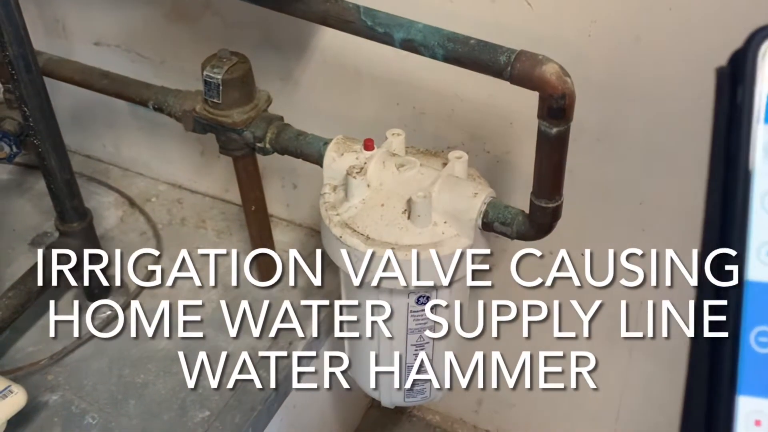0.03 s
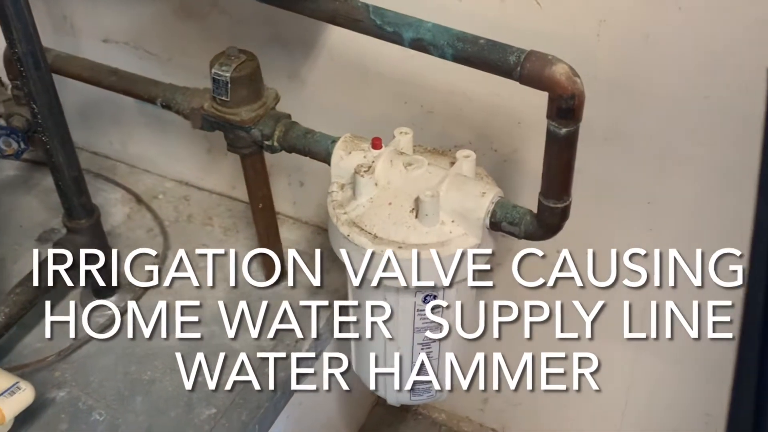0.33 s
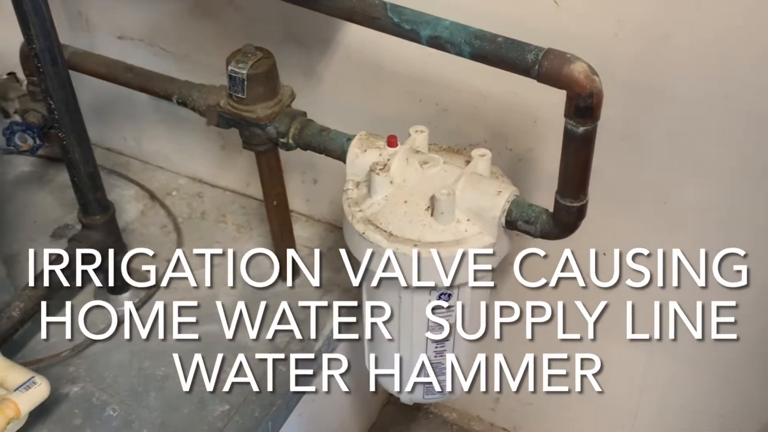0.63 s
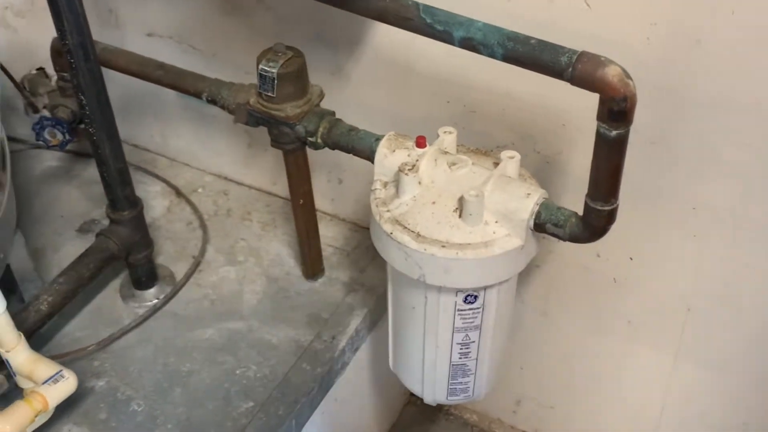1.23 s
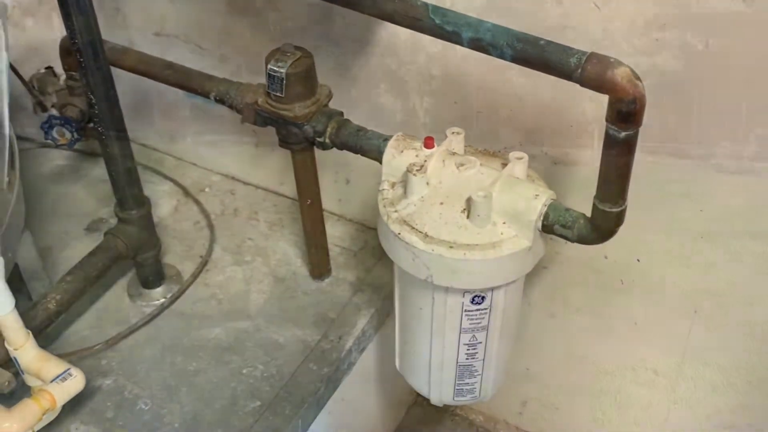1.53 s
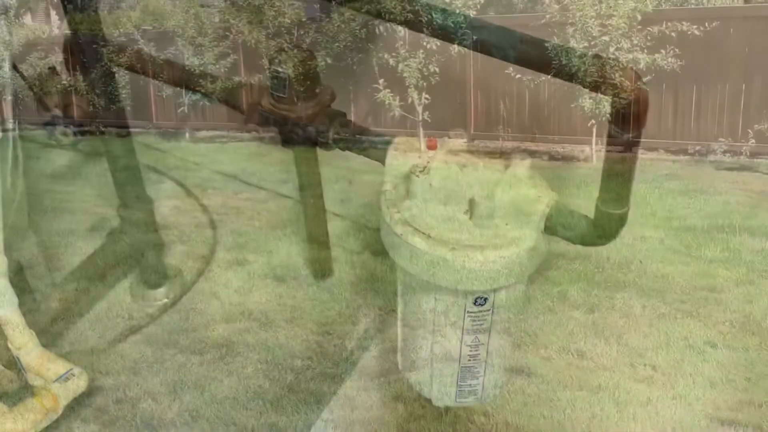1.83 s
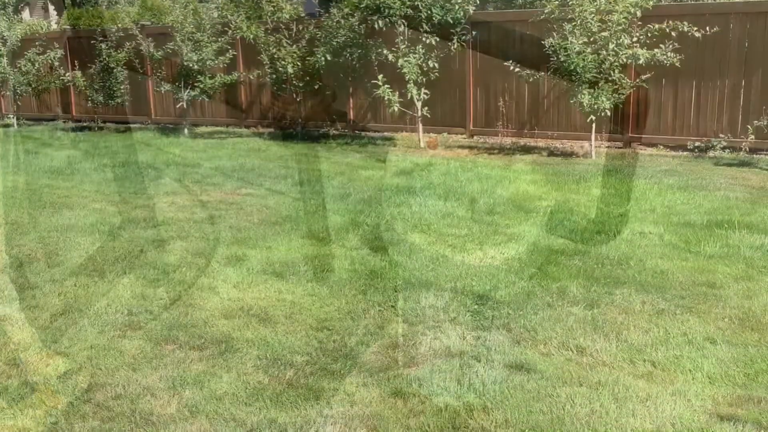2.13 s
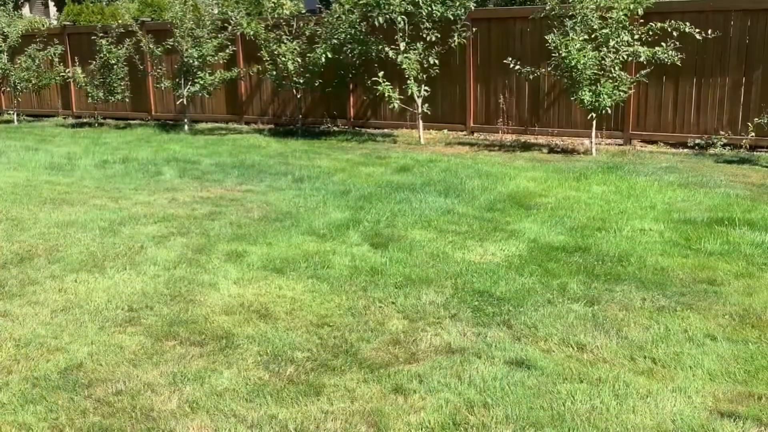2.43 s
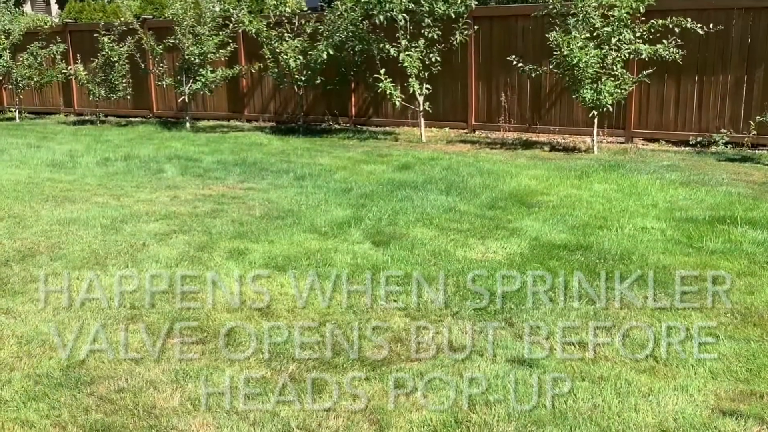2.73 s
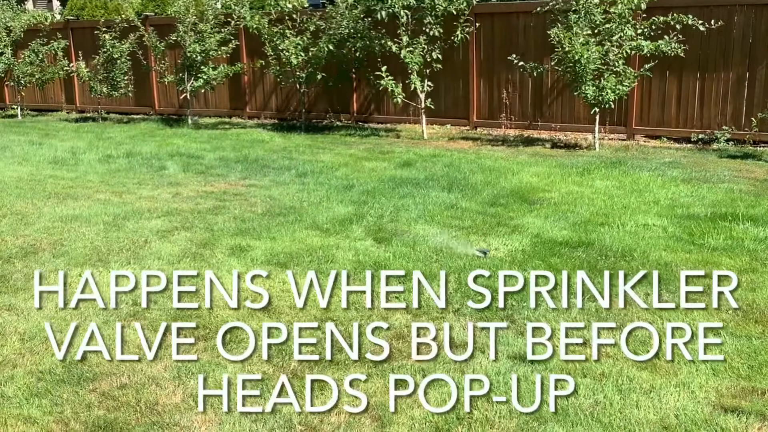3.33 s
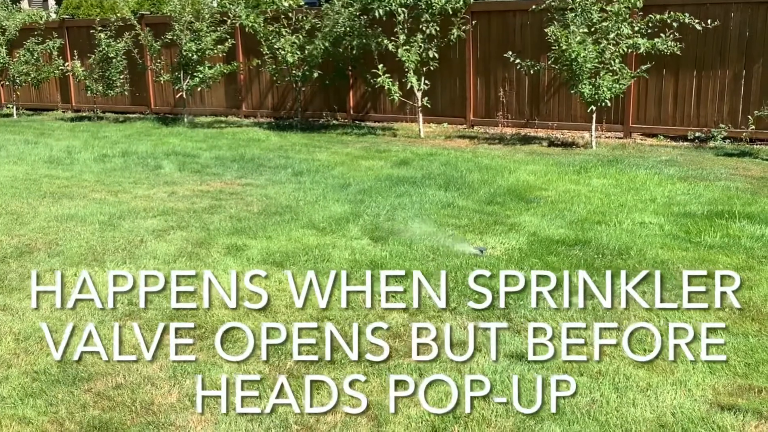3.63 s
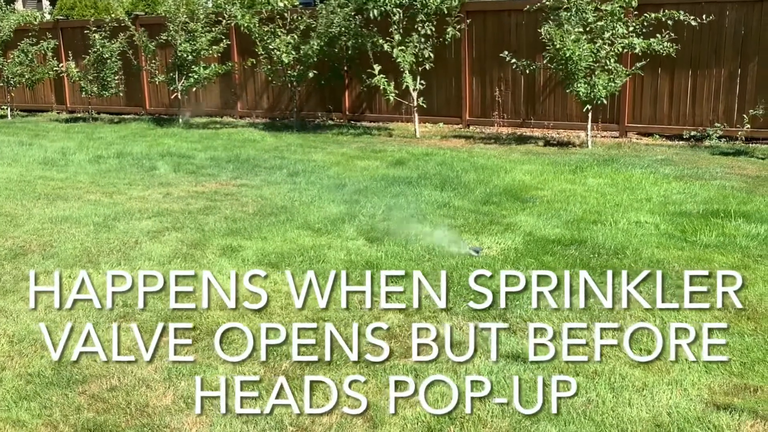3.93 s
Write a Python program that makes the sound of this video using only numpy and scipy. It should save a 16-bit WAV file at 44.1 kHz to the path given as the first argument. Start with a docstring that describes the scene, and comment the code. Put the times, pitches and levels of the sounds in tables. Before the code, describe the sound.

A water pipe bangs loudly in a basement, about nine times a second, each metal clank followed by dull knocks. It slows slightly and stops around 1.4 seconds with a faint creak. The microphone is bumped near 1.8 seconds. A distant sprinkler ticks faintly from 2.3 seconds; from 2.7 a nearer one gurgles, softly hisses and spits. Wind buffets the microphone, more strongly from 3.4 to 4 seconds.

```python
"""Water hammer in a basement: over a low rumble and faint hiss, surges of water make a copper pipe bang
about nine times a second, slow a little and stop. Each bang is a metal clank, then dull knocks of the
pipe against its supports. The pipe creaks, the microphone is bumped, and a garden fades in: a distant
sprinkler ticks, a near one gurgles, hisses and spits, and wind buffets the microphone."""
import sys
import numpy as np
from scipy import signal
from scipy.fft import rfft, irfft
from scipy.io import wavfile
from scipy.ndimage import uniform_filter1d

SR = 44100
rng = np.random.default_rng(int(sys.argv[2]) if len(sys.argv) > 2 else 0)


def put_to_file(sound):
    """Save the sound as 16-bit audio at rate SR, in the file named by the first command-line argument."""
    columns = np.atleast_2d(sound).T  # one column per channel
    safe = np.clip(columns, -1, 1)
    whole_steps = np.round(safe * 32767)
    wavfile.write(sys.argv[1], SR, whole_steps.astype(np.int16))


N = 176400

# the pipe's bangs: (time [s], thump level [dB], clank level [dB], clank's bite [dB], clank's treble [dB])
BANGS = [(0.0123, -0.5, -1.5, -9, -2.5), (.120, -0.5, -2, -11.5, -3.5), (0.2271, -1, -1.5, -7, 0),
         (.336, 0, -2, 1, 1.5), (0.447, -0.5, -3, 2.5, 4), (.56, -0.5, -4.5, 5.5, 5.5),
         (.677, -0.5, -6, 7.5, 6.5), (.796, -0.5, -5, 6.5, 5), (0.9147, -1.5, -4, 5, 6),
         (1.0353, -1, -1.5, 2.5, 3.5), (1.155, -0.5, -2, 4, 2), (1.275, -0.5, -3, 2.5, 1),
         (1.395, -3, -7.5, 4.5, -5)]
# how alike left and right sound: (frequency [Hz], likeness [-1 opposite to 1 the same])
INDOOR_LIKENESS = [(100, 0.76), (350, 0.93), (700, 0.31), (1300, -0.24), (2400, -0.081), (4000, -0.28),
                   (7000, -0.18), (9000, 0.69), (14000, 1)]
OUTDOOR_LIKENESS = [(150, 1), (400, 0.76), (900, 0.41), (3000, 0.36), (4200, 0.16), (7000, 0.57),
                    (9000, 0.9), (14000, .99)]


def from_db(db):
    """Turn decibels into a factor to multiply by."""
    return 10 ** (np.asarray(db) / 20)


def rms_one(x):
    """Scale a signal to an average power of 1."""
    return x / np.sqrt(np.mean(x ** 2) + 1e-20)


def clock():
    """The time of every sample, in seconds."""
    return np.arange(N) / SR


def level(rows):
    """A volume curve through points of (time [s], level [dB])."""
    return from_db(np.interp(clock(), *np.transpose(rows)))


def at_hz(points):
    """Read a (frequency [Hz], value) table at every frequency."""
    hz, value = np.transpose(points)
    return np.interp(np.log(np.fft.rfftfreq(N, 1 / SR) + 1), np.log(hz), value)


def noise(spectrum, likeness):
    """Stereo noise with the given tone colour and left-right likeness, at power 1."""
    mid, side = rfft(rng.standard_normal((2, N)))
    alike = np.clip(at_hz(likeness), -1, 1)
    stereo = np.sqrt(1 + alike) * mid + np.sqrt(1 - alike) * side * [[1], [-1]]
    return rms_one(irfft(from_db(at_hz(spectrum)) * stereo, N))


def butter(x, hz, kind, order=2):
    """A filter that keeps the "low" part, the "high" part or a "band" of a sound."""
    return signal.sosfilt(signal.butter(order, hz, kind, fs=SR, output="sos"), x + 1e-18)


def boost(x, db, hz, kind):
    """Turn one range of frequencies up or down."""
    return x + (from_db(db) - 1) * butter(x, hz, kind, order=1)


def even(x, size):
    """Hold the power near 1 over every stretch of `size` samples."""
    return x / np.sqrt(uniform_filter1d(x ** 2, size) + 1e-12)


def wobble(hz):
    """A random wavering, mostly slower than `hz`, at power 1."""
    return rms_one(butter(rng.standard_normal(N), hz, "low"))


def resonant_noise(hz, width_hz):
    """Steady noise around one pitch."""
    band = [hz - width_hz / 2, hz + width_hz / 2]
    return even(butter(rng.standard_normal(N), band, "band"), size=1200)


def burst(start, rise, hold, fall):
    """A volume curve that swells up to `start`, holds and dies away; all in seconds."""
    t = clock() - start
    return np.exp(np.maximum(np.minimum(t, 0) / rise - np.maximum(t - hold, 0) / fall, -60))


def clicks(times, gains):
    """One click at each time."""
    out = np.zeros(N)
    np.add.at(out, (np.abs(times) * SR).astype(int), gains)
    return out


def modes(table):
    """A struck object's tones, alternating in sign; each fades by 60 dB in its ring time."""
    t = clock()[:SR]
    return sum((-1) ** k * from_db(db - 60 * t / ring_s) * np.sin(2 * np.pi * hz * t)
               for k, (hz, db, ring_s) in enumerate(table))


def play(force, response):
    """Every push in `force` sets off a copy of the sound `response`."""
    return signal.fftconvolve(np.atleast_2d(force), np.atleast_2d(response)[:, :SR], axes=1)[:, :N]


def pipe(force, table):
    """The struck pipe rings; it works into a new position, which changes the strength of its tones."""
    shifted = np.clip((clock() - 0.23) / 0.3, 0, 1)  # moves from 0.23 s on, for 0.3 s
    first = modes([(hz, db, ring_s) for hz, db, _, ring_s in table])
    later = modes([(hz, db, ring_s) for hz, _, db, ring_s in table])
    return play(force * (1 - shifted), first) + play(force * shifted, later)


def air():
    """A faint background hiss sinks away, then comes back as garden air."""
    # tone colour of the air: (frequency [Hz], level [dB])
    colour = [(100, 4.5), (450, -2), (800, 3), (1300, 1.5), (2000, -5), (3800, -6.5), (5500, -9),
              (6500, -8), (10000, -14.5), (13500, -17.5), (16000, -17.5)]
    # its loudness: (time [s], level [dB])
    loudness = [(0, -45.5), (1.55, -65), (1.75, -62.5), (2.0, -56), (2.25, -53.5), (2.5, -49), (2.65, -52),
                (4, -53)]
    return noise(colour, OUTDOOR_LIKENESS) * level(loudness)


def wind():
    """Wind rumbles, the same in both ears, and eases off midway."""
    # tone colour of the rumble: (frequency [Hz], level [dB])
    colour = [(20, -18), (40, -5), (68, -1), (110, -13), (170, -18), (300, -35), (600, -44), (1500, -109)]
    # its loudness: (time [s], level [dB])
    loudness = [(0, -26.5), (1.45, -30), (1.56, -31), (1.72, -39), (2.1, -41), (2.22, -43.5), (2.38, -37),
                (2.55, -45), (2.63, -51), (2.8, -41), (3.1, -42), (3.32, -44), (3.46, -31.5), (3.7, -30),
                (3.87, -26.5), (4, -33.5)]
    return even(noise(colour, OUTDOOR_LIKENESS)[0], size=2600) * level(loudness)


def clanks():
    """The pipe scrapes its hanger and hits it with a crack; pipe and room ring, and metal clatters."""
    # tone colour of the clank: (frequency [Hz], level [dB])
    colour = [(500, -3), (800, 1), (1400, 1), (2100, -7), (3300, -0.5), (4300, -0.5), (5400, -16),
              (6150, -1.5), (6750, -9.5), (7500, -2.5), (9000, -2), (12000, 0), (15700, -4)]
    # tones of the pipe wall and fittings: (pitch [Hz], first level [dB], later level [dB], ring time [s])
    wall_tones = [(802,-34,-37,.2), (1070,-27,-35,.22), (1229,-42,-30,.18), (1416,-36,-32,.16),
                  (1787,-41,-37,.2), (2385,-35,-37,.14), (2525,-39,-42,.22), (3006,-48,-46,.4),
                  (3281,-42,-37,.16), (3760,-45,-40,.48), (4274,-40,-43,.2), (4750,-47,-44,.35),
                  (6180,-48,-38,.2), (7326,-55,-44,.45), (7507,-42,-50,.35), (7854,-48,-50,.35),
                  (8406,-50,-46,.25), (10147,-34,-36,.24), (11278,-44,-34,.2), (12489,-33,-34,.13),
                  (13722,-40,-34,.09)]
    t, force, cracks, blows = clock(), 0, 0, 0
    grit = rng.standard_normal(N)
    for start, _, db, bite_db, treble_db in BANGS:
        chatter = grit * burst(start, rise=0.0008, hold=0, fall=0.0008)
        scrape = grit * burst(start - 0.001, rise=0.003, hold=0, fall=0.0008)
        contact = clicks([start], 0.99) + from_db(-10) * chatter / np.linalg.norm(chatter)
        contact += from_db(-16) * scrape / np.linalg.norm(scrape)
        contact = boost(contact, bite_db, [2400, 5630], "band")
        force += from_db(db) * boost(contact, treble_db, 6500, "high")
        blows += clicks([start], from_db(db + 0.35 * bite_db))
        cracks += from_db(db + treble_db) * burst(start, rise=0.0013, hold=0.0014, fall=0.00068)
    crack = butter(noise(colour, INDOOR_LIKENESS), 3060, "high", order=1) * from_db(-16.5) * cracks
    metal = noise(colour, INDOOR_LIKENESS)
    clatter = metal * from_db(-21.5) * burst(0.0025, rise=0.0013, hold=0, fall=0.013)
    echo_fade = from_db(-28 - 60 * t / 0.29) * np.minimum(t / 0.0031, 1)  # the room rings for 0.29 s
    room = butter(metal[:, ::-1], 3900, "low", order=1) * echo_fade
    out = crack + play(force, butter(clatter + room, 490, "high")) + pipe(blows, wall_tones)
    return boost(out, [[2], [-2]], [400, 3500], "band")  # the middle range is louder on the left


def thumps():
    """Every pressure surge throws the pipe against its supports, and the basement booms."""
    # knocks after each bang: (delay [s], level [dB], dulled above [Hz])
    rebounds = [(.001, -4.5, 600), (0.0175, 1, 269), (0.0336, -5.5, 400), (0.045, -1.5, 220),
                (0.0625, -1, 100)]
    # tones of the bending pipe: (pitch [Hz], first level [dB], later level [dB], ring time [s])
    bending_tones = [(46.6,-28,-42.5,.2), (63,-33,-27,.12), (112.5,-24,-15.5,0.093), (145,-23.5,-18.5,0.11),
                     (202,-23,-24,0.22), (233.6,-29,-31.5,0.12), (289,-22,-29,0.12), (335,-29,-38.5,.14),
                     (409.6,-30,-33,0.25), (447,-28.5,-34,.22), (537.5,-28,-32,0.11), (618,-29,-34.5,0.084),
                     (735,-29,-39.5,0.11)]
    # tone colour of the boom: (frequency [Hz], level [dB])
    colour = [(25, -28), (40, 0), (70, -5), (120, -2.5), (170, 1), (300, -0.5), (450, -12), (700, -17.5),
              (1300, -34)]
    times, thump_db, *_ = np.transpose(BANGS)
    t, knocks = clock(), 0
    for delay, db, hz in rebounds:
        jitter = rng.normal(0, 0.00043, len(times))
        knocks += butter(clicks(times + delay + jitter, from_db(thump_db + db)), hz, "low", order=1)
    swell = np.minimum(t / 0.025, 1) * from_db(-18 - 60 * t / 0.3)  # rises in 25 ms, rings for 0.3 s
    boom = even(noise(colour, INDOOR_LIKENESS), size=1500) * swell
    return play(clicks(times, from_db(thump_db)), boom) + pipe(knocks, bending_tones)


def squeak():
    """The pipe creaks faintly as it settles."""
    creak = resonant_noise(1033, width_hz=110)
    return from_db(-43) * creak * burst(1.5, rise=0.0079, hold=0.0095, fall=0.028)


def buffets():
    """Handling bumps, then puffs of wind, hit the microphone with short, lumpy thuds."""
    # bumps and puffs: (time [s], length [s], level [dB], dulled above [Hz])
    puffs = [(1.623, 0.033, -35.5, 330), (1.67, 0.014, -38, 400), (1.772, 0.018, -30.5, 149),
             (1.804, 0.013, -35, 317), (1.824, 0.0074, -26.5, 382), (1.849, 0.0079, -23.5, 378),
             (1.87, 0.013, -25, 128), (2.43, 0.07, -33.5, 64.6), (2.7, 0.049, -35.5, 74),
             (2.877, 0.02, -30, 65), (3.047, 0.01, -32.5, 88), (3.153, 0.014, -39, 200),
             (3.385, 0.026, -24.5, 180), (3.515, 0.034, -28.5, 210), (3.565, 0.03, -26, 200),
             (3.748, 0.04, -31, 202), (3.792, 0.052, -26.5, 167), (3.867, 0.014, -27.5, 209),
             (3.898, 0.011, -23.5, 258), (3.965, 0.011, -29.5, 190)]
    swirls = rng.standard_normal(N) * from_db(-wobble(hz=490))
    out = 0
    for start, length, db, hz in puffs:
        thud = butter(butter(swirls, hz, "low", order=3), 54, "high")
        out += from_db(db) * even(thud, size=1100) * burst(start, rise=0.0016, hold=length, fall=0.0068)
    return out


def taps():
    """Soft taps on the microphone's case ring it briefly."""
    # the taps: (time [s], level [dB])
    touches = [(1.83, -21), (1.855, -18.5)]
    # tones of the case: (pitch [Hz], level [dB], ring time [s])
    case_tones = [(130, 2.5, 0.063), (359, -2, 0.03), (540, -9, 0.027)]
    times, db = np.transpose(touches)
    return play(butter(clicks(times, from_db(db)), 1000, "low"), modes(case_tones))


def far_sprinkler():
    """A swinging arm cuts a distant water jet, ticking up to about ten times a second."""
    # the ticks: (time [s], level [dB])
    ticks = [(2.292, -53), (2.384, -50), (2.479, -46.5), (2.574, -50.5), (2.67, -53), (2.761, -50),
             (2.866, -45.5), (2.965, -53), (3.06, -52), (3.165, -52), (3.275, -53), (3.375, -46.5),
             (3.47, -46), (3.735, -49), (3.951, -46)]
    pulses = sum(from_db(db) * burst(start, rise=0.0046, hold=0.0064, fall=0.0072) for start, db in ticks)
    return resonant_noise(3750, width_hz=1550) * pulses


def near_sprinkler():
    """Fluttering spray and spattering drops follow the water pressure; trapped air gurgles and spits."""
    # water pressure, heard as hiss: (time [s], level [dB])
    flow = [(0, -120), (2.2, -100.5), (2.72, -62.5), (2.81, -44.5), (2.9, -47), (3.0, -44.5), (3.15, -45.5),
            (3.32, -50.5), (3.5, -47), (3.68, -44), (3.9, -43), (4, -40.5)]
    # tone colour of the spray: (frequency [Hz], level [dB])
    colour = [(600, -17), (1800, -6.5), (3000, -6), (4200, -2), (5500, -4), (6500, -2), (9500, -3),
              (10700, 1.5), (13000, -2), (15000, -4.5), (16000, -29)]
    # gurgles in the nozzle: (time [s], length [s], level [dB], pitch [Hz])
    bubbles = [(2.747, 0.0048, -38, 467), (2.784, 0.035, -49.5, 600), (2.831, 0.022, -45.5, 630)]
    # air spat from the nozzle: (time [s], level [dB])
    air_pops = [(3.051, -25), (3.061, -34), (3.091, -24.5), (3.126, -27.5), (3.324, -35), (3.535, -34),
                (3.808, -28), (3.872, -28.5)]
    flutter_db, surge_db = 2.76 * wobble(hz=87), 1.46 * wobble(hz=12)
    spray = noise(colour, OUTDOOR_LIKENESS) * level(flow) * from_db(flutter_db + surge_db)
    pops = sum(from_db(db) * burst(start, rise=0.00015, hold=0, fall=0.0025) for start, db in air_pops)
    spits = butter(noise(colour, OUTDOOR_LIKENESS), 6000, "high", order=1) * pops
    landings = rng.random(N) < 280 / SR  # about 280 drops a second
    drops = landings * from_db(-10 * np.minimum(rng.exponential(1, N), 3))
    splashes = play(drops, burst(0, rise=1, hold=0, fall=0.00054)) * noise(colour, OUTDOOR_LIKENESS)
    spatter = rms_one(splashes) * level(flow) * from_db(-17.5)
    gurgles = sum(from_db(db) * resonant_noise(hz, width_hz=350) * burst(start, 0.002, length, 0.013)
                  for start, length, db, hz in bubbles)
    return spray + spits + spatter + gurgles


def scene():
    """The basement pipe, then the garden sprinklers, with air, wind and bumps on the microphone."""
    background = air()
    basement = thumps() + clanks() + squeak()
    garden = near_sprinkler() + far_sprinkler()
    return background + basement + garden + wind() + buffets() + taps()


def record(dry):
    """The microphone's right opening lags its left; the deepest bass and highest treble are cut."""
    # how far the right side lags: (frequency [Hz], lag [cycles])
    right_lag = [(0, 0), (400, 0), (1300, .5), (2300, 1), (3200, 1.5), (4150, 2), (5050, 2.5), (6500, 3),
                 (7700, 3.2), (8600, 3.5), (10150, 4), (15000, 5.5), (17000, 6.1)]
    cycles = np.interp(np.fft.rfftfreq(2 * N, 1 / SR), *np.transpose(right_lag))
    right = irfft(rfft(dry[1], 2 * N) * np.exp(-2j * np.pi * cycles))[:N]
    treble_cut = signal.ellip(10, .2, 70, 15800, fs=SR, output="sos")
    return signal.sosfilt(treble_cut, butter(np.array([dry[0], right]), 36, "high"))


dry = scene()
out = record(dry)
put_to_file(out)
```